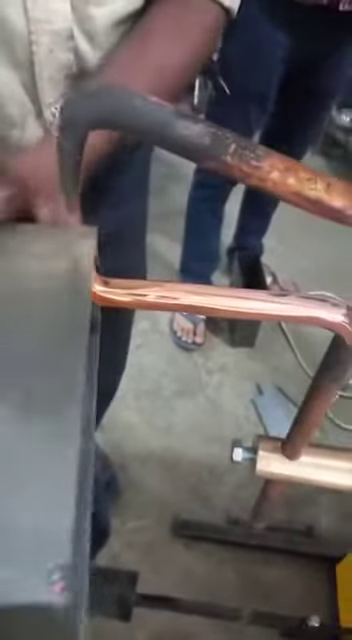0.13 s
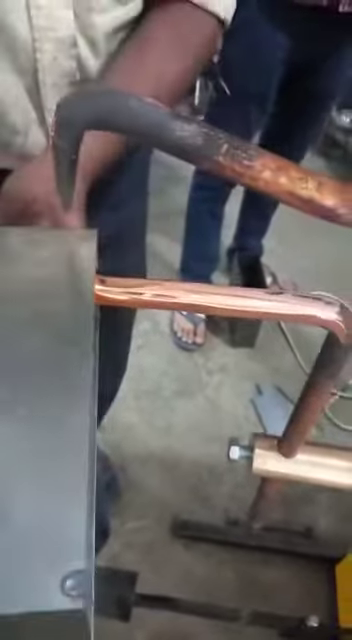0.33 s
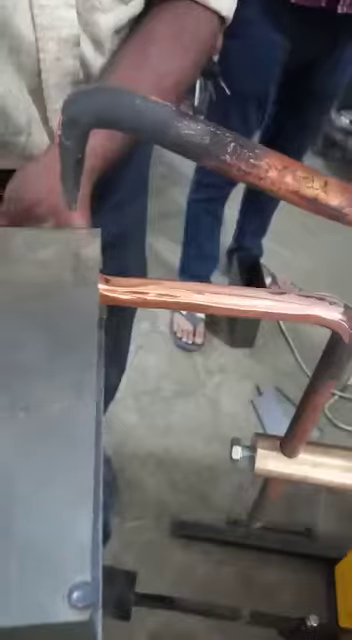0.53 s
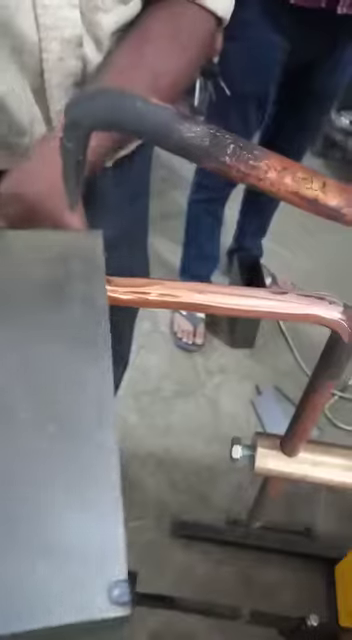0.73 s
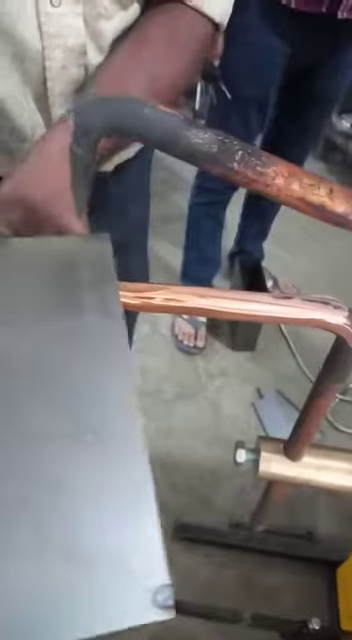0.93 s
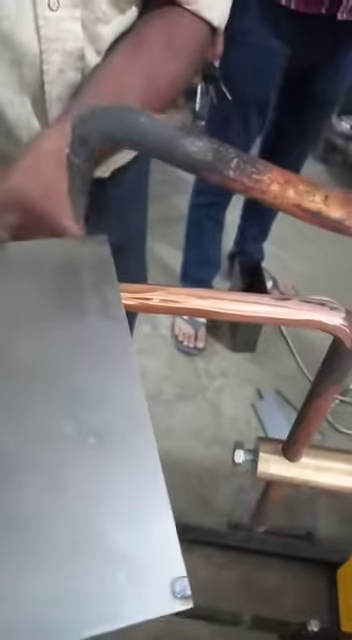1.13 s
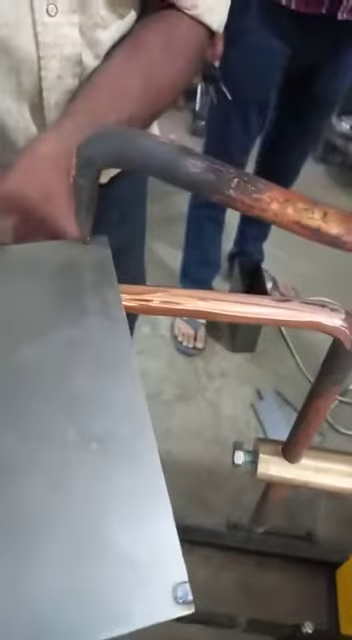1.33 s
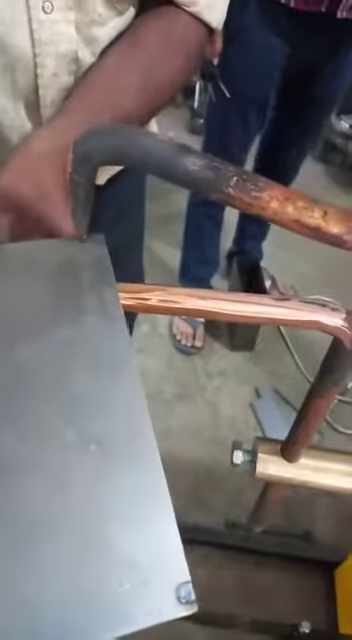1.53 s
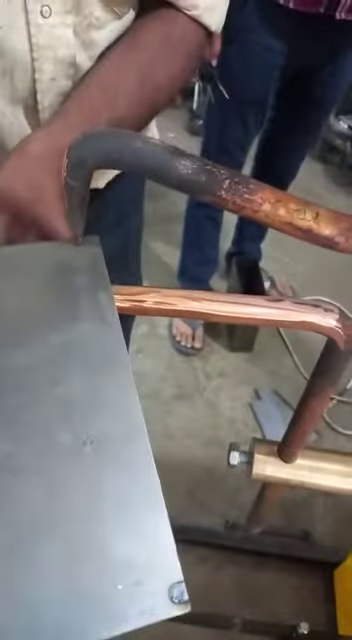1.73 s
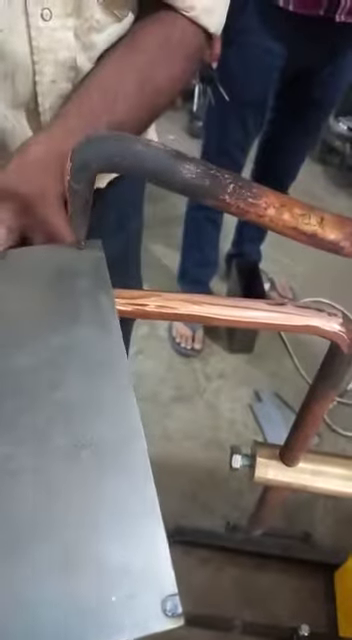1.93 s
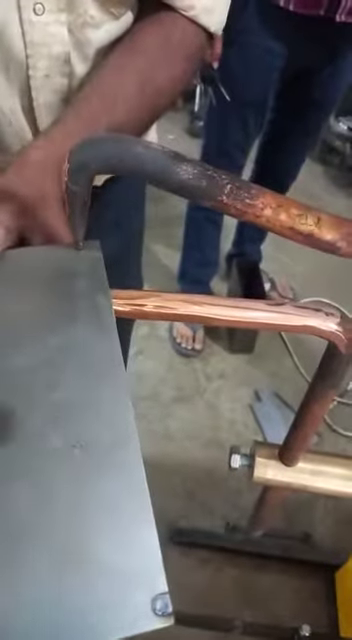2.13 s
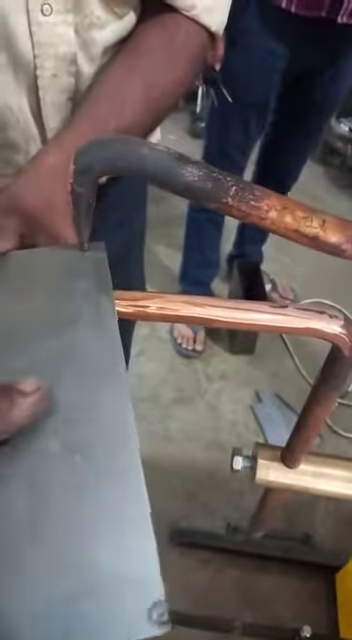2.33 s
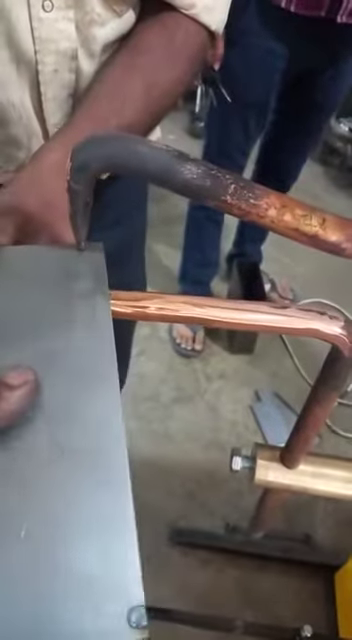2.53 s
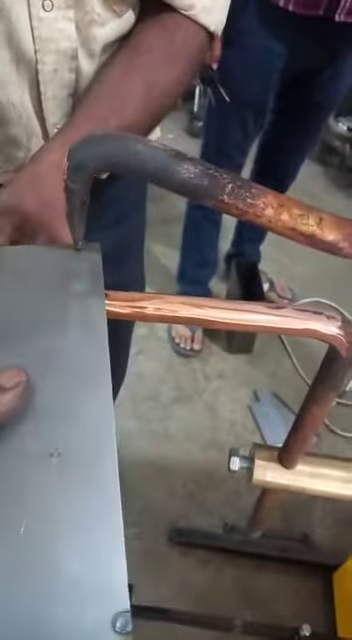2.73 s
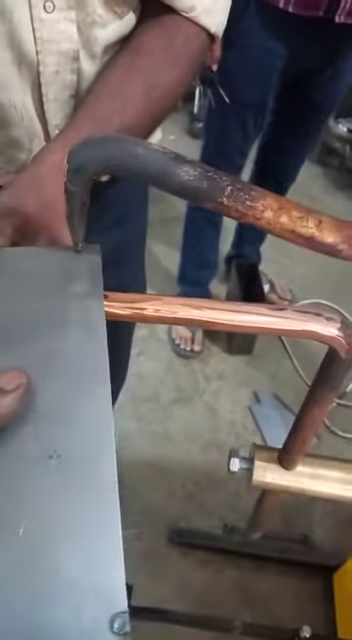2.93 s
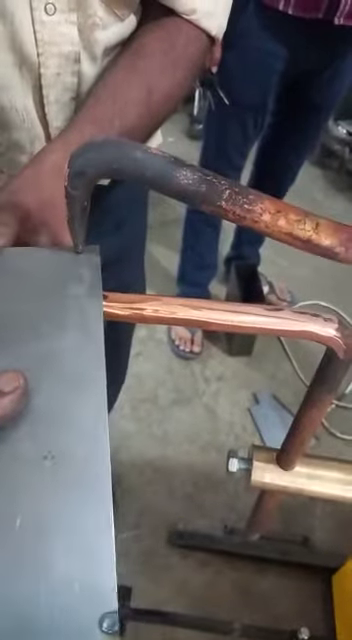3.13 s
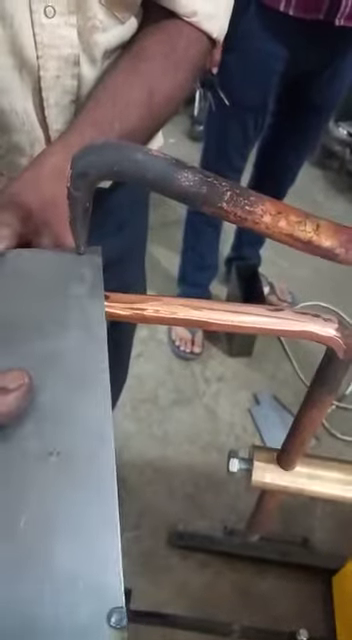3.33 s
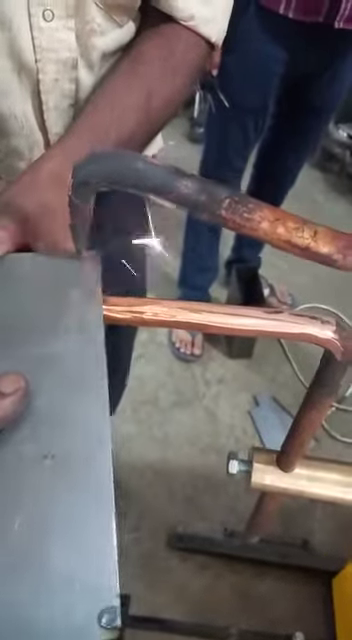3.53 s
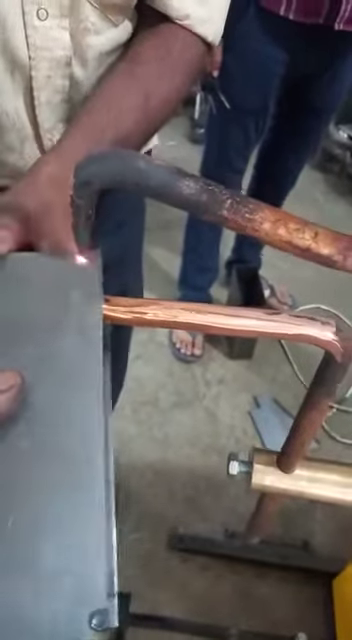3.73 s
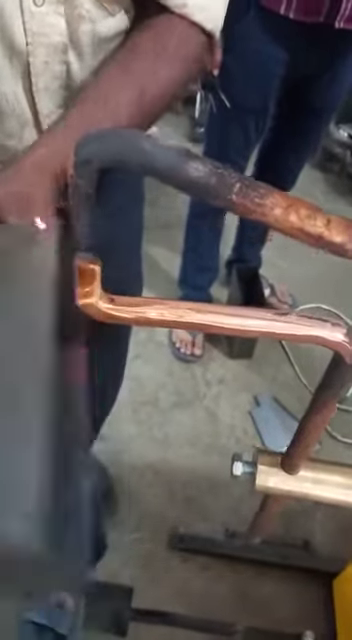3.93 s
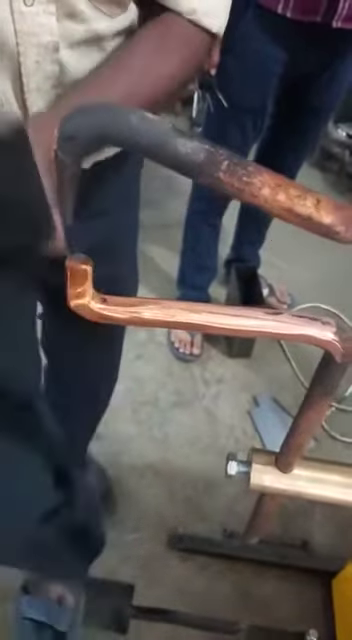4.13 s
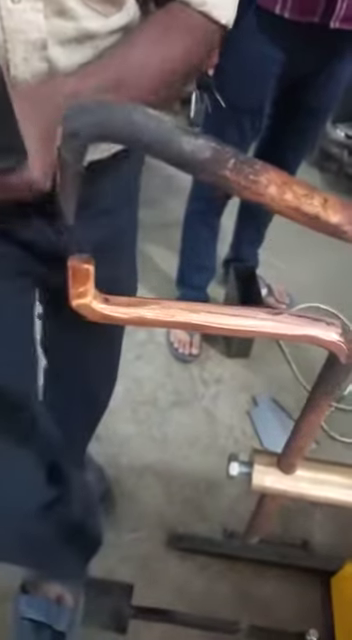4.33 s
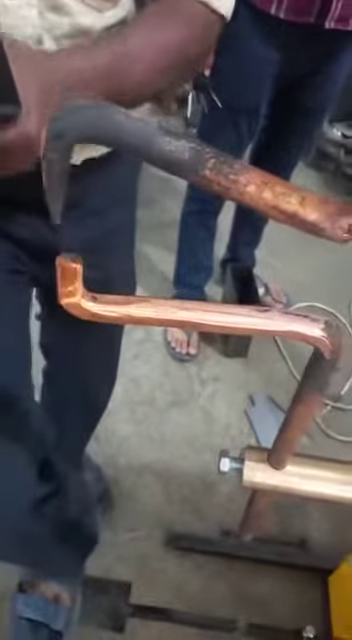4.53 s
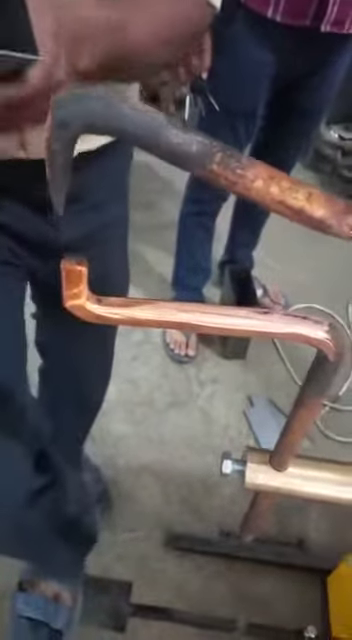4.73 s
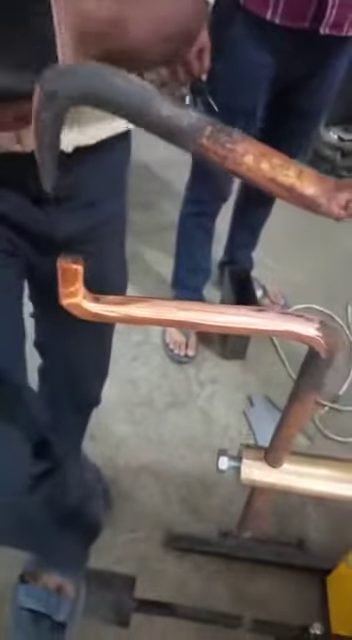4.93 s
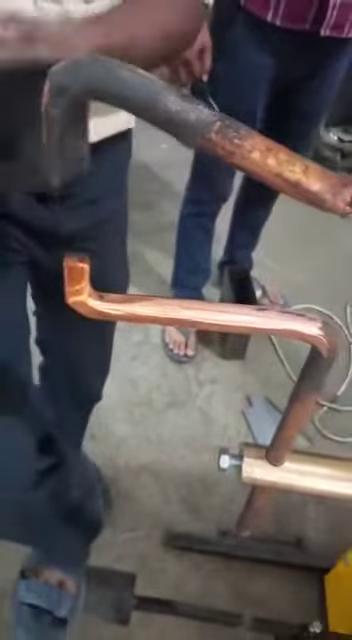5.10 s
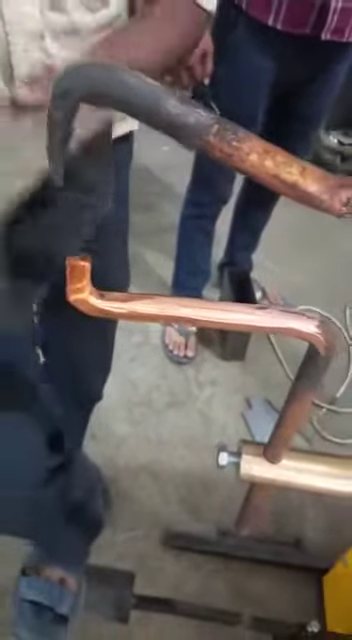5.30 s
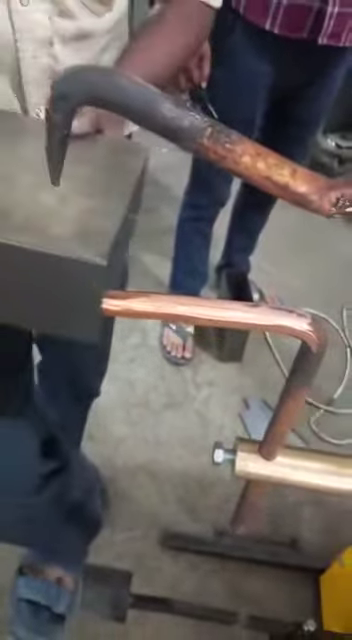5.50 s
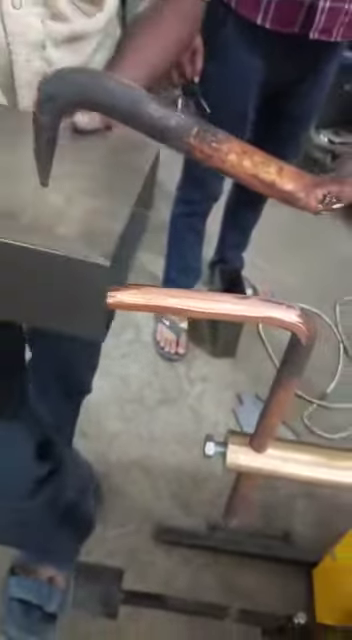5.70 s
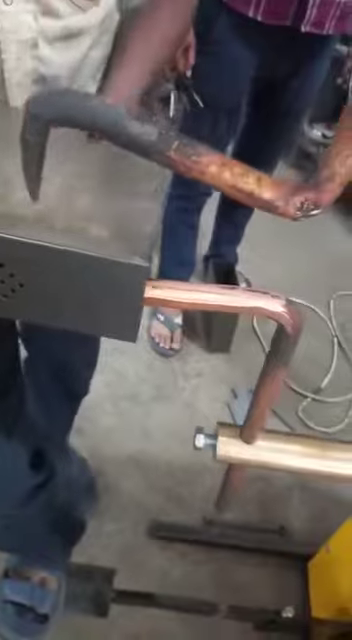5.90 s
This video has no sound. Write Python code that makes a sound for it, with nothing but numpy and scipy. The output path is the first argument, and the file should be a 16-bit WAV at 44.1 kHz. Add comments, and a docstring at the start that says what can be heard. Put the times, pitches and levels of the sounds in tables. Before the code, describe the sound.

A sheet-steel box knocks and scrapes in a humming workshop, a pedal creaks, a weld briefly buzzes, then one loud ringing clank.

```python
"""A sheet-steel box is knocked, slid and turned between the arms of a spot welder. Each knock drives a bank of
decaying box modes plus a short noise crack; steel and sandals scrape as shaped hiss. Noisy resonances make the
panels drum, the pedal linkage creak and an edge squeal; the weld current buzzes briefly as stacked harmonics.
The hard walls throw back a smeared tail of every knock and groan, over a low machine drone and the roar of the
shop."""
import sys
import numpy as np
from scipy import signal
from scipy.fft import rfft, irfft
from scipy.io import wavfile
from scipy.ndimage import uniform_filter1d

SR = 44100
rng = np.random.default_rng(int(sys.argv[2]) if len(sys.argv) > 2 else 0)


def materialize(psi):
    """Save the field psi as 16-bit PCM at rate SR to the path in sys.argv[1].

    A 1-D psi becomes a single channel; in a 2-D psi each row is a channel.
    """
    bounded = np.clip(np.atleast_2d(psi).T, -1, 1)
    quanta = np.round(bounded * 32767).astype(np.int16)
    wavfile.write(sys.argv[1], SR, quanta)


N = 267240  # length in samples

# Blows on the box: start_s, level_db, centre_hz of the driven modes, spread_octaves,
# contact_s (build-up time constant), ring_scale (multiplies the modes' ring time; over 1 rings longer)
BLOWS = [(.098, -30.5, 148, 0.29, 0.017, 1.05), (.100, -31.5, 500, 0.13, 0.0021, 0.28),
         (.176, -23.5, 715, 0.5, 0.0059, 0.44), (.190, -23, 2015, 0.97, 0.008, 0.61),
         (1.275, -28, 834, 0.5, 0.02, 0.2), (1.276, -49, 2230, .4, 0.0036, 0.64),
         (1.290, -48, 2800, 0.1, 0.0036, 0.85), (2.3727, -33.5, 2630, 0.42, 0.0046, 0.3),
         (2.372, -27, 740, 0.51, 0.0014, 0.53), (2.682, -50.5, 2640, 1.5, 0.0016, 1),
         (3.104, -40, 860, 0.66, 0.005, 0.74), (3.364, -34, 670, 0.29, 0.051, 0.57),
         (3.474, -32.5, 2400, 0.42, 0.018, 2), (3.474, -39, 4520, 0.089, 0.012, 1.4),
         (3.75, -39, 2980, 0.29, 0.003, 1.6), (3.790, -30, 890, 1, 0.26, 0.45),
         (3.838, -42, 2620, 0.04, 0.005, 2), (4.155, -42.5, 643, 0.045, 0.01, 0.42),
         (4.794, -40, 2200, 0.77, 0.0024, 0.5), (4.806, -46.5, 3600, 0.22, 0.0018, 0.41),
         (4.805, -45.5, 504, 0.078, 0.015, 4.7), (4.896, -46.5, 5070, 0.03, 0.00085, 2.1),
         (4.896, -47, 6200, 0.16, .002, 0.52), (4.897, -49, 3150, 0.04, 0.001, 1.1),
         (5.356, -51.5, 2320, 0.083, 0.0054, 0.15), (5.48, -26.5, 4750, 0.21, 0.0035, 0.85),
         (5.481, -15.5, 1540, 0.032, 0.0055, 0.88), (5.4813, -19, 1030, 0.9, 0.00083, 3.7),
         (5.505, -32, 4200, 0.56, 0.01, 0.59), (5.507, -25, 686, 0.61, 0.0087, 1),
         (5.609, -39.5, 1490, 0.06, 0.0068, 1.2), (5.707, -41.5, 1570, 0.25, 0.019, 2.6),
         (5.755, -37, 1000, 0.6, 0.015, 1.8)]
# Free modes of the box, before ring_scale: pitch_hz, level_db, t60_s
BOX_MODES = [(151.8, -7.5, 0.29), (488.6, -5, 0.26), (575.6, -7, 0.33), (653.6, -11.5, 0.3),
             (724, -3.5, 0.19), (786, -1, 0.17), (1060, -2.5, 0.041), (1218, -2.5, 0.2),
             (1497, -0.5, 0.074), (1660, -10, 0.08), (2038, -2.5, 0.15), (2326, 0.5, 0.061),
             (2610, 1, 0.099), (2855, -1.5, 0.067), (3150, -6, 0.13), (3660, -20, 0.045),
             (3910, -2.5, 0.089), (4160, -4, 0.077), (4420, -4.5, 0.1), (4820, 1.5, 0.052), (5130, -6, 0.2),
             (5646, -2.5, 0.11), (5590, -3.5, 0.062), (6440, -1.5, 0.04)]
# Noise spectrum of a blow's edge: pitch_hz, level_db
CRACK_COLOUR = [(300, -19), (1000, -2), (3000, 1.5), (6500, -9.5), (7500, -36.5)]
# Where the box is held: time_s, left_minus_right_db, left_lead_us
BOX_SIDE = [(.1, -0.5, -92.5), (1.3, -1.5, -36), (2.4, -5.5, -97), (3.401, -1, 220), (4.2, 5, 176),
            (4.8, -4.5, -300), (5.4, -9.5, 186), (5.5, 3.5, 126)]
SKIRT_DB = -23.5  # every blow also stirs the modes far from its centre
RATTLE_DB = 3.0  # rms flutter of each mode once the loose sheet rattles
CRACK_DB, CRACK_DB_PER_OCTAVE = -4.5, 7.5  # crack setting at a 1 kHz centre; brighter blows crack harder
GRIP_S, GRIP_T60 = 5.528, 0.06  # the hand damps the box after the big clank (s, added decay t60 s)

# Scraping strokes: start_s, level_db, length_s, hiss_db (treble, about 8 kHz up), body_db (under 1.2 kHz)
STROKES = [(0, -47.5, 0.0024, -15, 23), (0.083, -18.5, 0.11, -9, -62), (0.113, -25.5, 0.085, -6.5, 15.5),
           (0.284, -30, 0.14, -8.5, 13.5), (1.669, -28, 0.076, -13.5, -10),
           (1.777, -36.5, 0.074, -4.5, 12.5), (2.148, -52.5, 0.053, -6, 28.5),
           (2.177, -38, 0.11, -12.5, -15), (2.675, -31, 0.033, -7.5, -10),
           (2.801, -21.5, 0.067, -10.5, -10), (3.058, -49, 0.23, -17.5, 12), (3.377, -34, 0.089, -12, 15),
           (3.426, -35, 0.16, -84, 18.5), (3.587, -42.5, 0.21, -19, 19.5), (3.752, -38.5, 0.031, -15, 22),
           (3.764, -35, 0.076, -10, 19.5), (3.93, -44, 0.17, -11, 3), (4.077, -41, 0.085, -6, 8),
           (4.401, -25.5, 0.11, -9.5, -4), (4.614, -53.5, 0.086, 5, 25), (4.739, -44.5, 0.021, -6, 14),
           (4.776, -46, 0.13, -7.5, 23), (5.132, -45.5, .15, -8, -41), (5.368, -42, 0.081, -17, 17),
           (5.415, -46.5, .006, 1, -20), (5.481, -25.5, 0.011, -7, 13), (5.71, -39, 0.083, -6, 6.5),
           (5.942, -29, 0.064, -8, -6)]
# Friction hiss spectrum: pitch_hz, density_db (dB per Hz)
SCRAPE_COLOUR = [(250, -5), (450, -6.5), (700, -10.5), (1100, -2), (1940, 1), (3300, 0), (6450, -0.5),
                 (7000, -6), (7500, -14), (8600, -3), (11600, 1.5), (15800, -2)]
LUMPY_DB = 1.5  # random unevenness of colour within each stroke
SWELL_SHARE, SWELL_MAX_S = 0.52, 0.082  # a stroke rises for a share of its length, up to a limit
STRUCK_S, STRUCK_LAG_S, STRUCK_RISE_S = .012, .003, .002  # a stroke this near a blow follows it, lag, rise
NEAR_T60, FAR_T60, FAR_DB = 0.55, 0.96, -3.5  # direct hiss stops quickly, the shop's tail is weaker, slower
TREBLE_LOSS = 1  # extra share of decay speed in the treble

# Groaning linkage and drumming panels, one list per groan: time_s, level_db
GROANS = [
    [(.066, -48), (.096, -35), (.17, -40.5), (.65, -47.5)],
    [(3.37, -52), (3.40, -40.5), (3.53, -32), (3.60, -45), (3.70, -37), (3.86, -44), (4.1, -46)],
    [(5.53, -48), (5.60, -52), (5.68, -46), (5.72, -36.5), (5.81, -43.5), (5.86, -50.5)],
]
# Low panel resonances: pitch_hz, width_hz, level_db
GROAN_RING = [(220.4, 110, 5.5), (578.5, 130, 2), (641, 59, -5.5), (768, 120, -10), (1223, 140, -8.5)]
# The pedal linkage creaks under load: time_s, pitch_hz, level_db
CREAK = [(3.362, 520, -38), (3.372, 529, -28), (3.41, 617, -32), (3.478, 704, -33.5), (3.496, 652, -27.5),
         (3.515, 651, -43), (3.6, 646, -40)]
# An edge sings while dragged, dropping to a lower mode: time_s, pitch_hz, level_db
SQUEAL = [(.112, 6190, -43.5), (.143, 6200, -27), (.15, 5780, -33.5), (.2, 5790, -34), (.32, 5790, -53),
          (.34, 5840, -41.5), (.43, 5760, -49), (.62, 5790, -64)]
CREAK_WIDTH_HZ, SQUEAL_WIDTH_HZ = 53, 160

# Harmonics of the weld buzz: multiple, level_db
BUZZ = [(2, 2), (3, -7), (4, -8.5), (5, -14), (7, -9), (8, -9)]
BUZZ_HZ = 100  # twice the mains
WELD_ON_S, WELD_OFF_S, WELD_EDGE_S, WELD_DB = 3.56, 3.765, 0.054, -36.5

# Decay of the hard-walled shop: pitch_hz, t60_s
SHOP_DECAY = [(200, 1), (700, 0.42), (2000, 0.66), (5000, 0.25), (12000, 0.76)]
SMEAR_HZ = 300  # random phase smear that makes the wall tail less tonal

# Wavering lines of the machine drone: pitch_hz, level_db, width_hz
HUM_LINES = [(113, -49, 8.9), (68.4, -41, 4.1), (53.9, -49.5, 10), (85.5, -42, 6.5)]
# Spectrum of the shop's low roar: pitch_hz, density_db (dB per Hz)
ROAR_COLOUR = [(30, -31), (50, 0.5), (110, -4), (140, -12), (242, -15.5), (394, -22.5), (988, -36.5),
               (3250, -51), (6740, -53.5), (7310, -73), (16000, -63)]
HUM_HZ, HUM_DB, ROAR_DB = 116, -36.5, -34.5

# Stereo balance of the noises: pitch_hz, left_minus_right_db
TILT = [(60, .3), (150, 2.5), (500, 0), (1500, -5.5), (4000, -3), (10000, 2.5)]
# Left-right likeness of the noises: pitch_hz, correlation
SAME = [(60, .99), (180, .96), (550, .7), (1650, .1), (5000, -.1), (15000, .1)]
EDGE_HZ = 15900  # upper band limit


def blows():
    """Each contact builds up the box modes near its centre; they ring, flutter as loose sheet and crack."""
    t = np.arange(SR // 3) / SR
    hz, mode_db, t60 = np.transpose(BOX_MODES)[..., None]
    held, *sides = np.transpose(BOX_SIDE)
    out = np.zeros((2, N + SR))
    edge_hz = np.fft.rfftfreq(4096, 1 / SR)
    edges = rng.standard_normal((len(BLOWS), 2, 4096))  # separate crack noise for each port
    # Neighbouring modes start about half a cycle apart
    scatter = .08 * rng.standard_normal((len(BLOWS), len(BOX_MODES), 1))
    turns = np.arange(len(BOX_MODES))[:, None] / 2 + scatter
    # A new flutter value about every 7 ms; clean at first, full after 25 ms
    rattles = rng.standard_normal((len(BLOWS), len(BOX_MODES), len(t) // 300))
    flutter = RATTLE_DB * np.minimum(t / .025, 1)
    onset = np.minimum(t[:4096] / 6e-4, 1)
    for k, (start, level_db, centre_hz, octaves, contact, ring_scale) in enumerate(BLOWS):
        pan_db, lead_us = (np.interp(start, held, column) for column in sides)
        ports = t + np.array([lead_us, -lead_us])[:, None, None] / 2e6

        distance = np.log2(hz / centre_hz) / max(octaves, .05)
        share = np.exp(-.5 * distance ** 2) + gain_of(SKIRT_DB)
        fade = np.exp(-t / max(contact, 1e-4))
        build_up = 1 - fade ** 2
        ring_loss_db = 60 * t / (t60 * max(ring_scale, .1))
        grip_loss_db = 60 * np.maximum(start + t - GRIP_S, 0) / GRIP_T60 * (start < GRIP_S)
        rattle_db = flutter * signal.resample(rattles[k], len(t), axis=1)
        envelope = gain_of(mode_db - ring_loss_db - grip_loss_db + rattle_db) * build_up
        ring = (share * envelope * np.sin(2 * np.pi * (hz * ports + turns[k]))).sum(1)
        ring = ring / np.sqrt(np.mean(ring[:, :1000] ** 2))

        # The crack stays near the blow's centre; narrow pings hardly crack
        too_high = 1 + (edge_hz / (3.1 * centre_hz)) ** 4
        too_low = 1 + (centre_hz / (1.74 * edge_hz + 1)) ** 4
        edge_gain = gain_of(read(CRACK_COLOUR, edge_hz)) / too_high / too_low
        crack = evened(irfft(rfft(edges[k]) * edge_gain)) * fade[:4096] * onset
        crack_db = CRACK_DB + CRACK_DB_PER_OCTAVE * np.log2(centre_hz / 1e3)
        ring[:, :4096] += gain_of(crack_db) * min(4 * octaves, 1) * crack

        at = round(start * SR)
        out[:, at:at + len(t)] += gain_of(level_db + np.array([[pan_db], [-pan_db]]) / 2) * ring
    return out[:, :N]


def scrape():
    """Dense friction hiss: each stroke swells, holds and dies in the shop, the treble first."""
    blow_starts = [row[0] for row in BLOWS]

    def strokes(hz, s):
        """Sums the strokes' power at each pitch and moment, then colours it."""
        high = 1 / (1 + (7800 / (hz + 1)) ** 12)
        low = 1 / (1 + (hz / 1200) ** 4)
        power = 0
        # A small random unevenness of colour, drawn anew for each stroke
        lumps = rng.standard_normal((len(STROKES), len(hz), 1))
        lumps = evened(uniform_filter1d(lumps, size=3, axis=1))
        for (start, level_db, length, hiss_db, body_db), lump in zip(STROKES, lumps):
            colour_db = level_db + LUMPY_DB * lump + high * hiss_db + low * body_db
            after = 60 * np.maximum(s - start - length, 0) * (1 + TREBLE_LOSS * high)
            fall = np.maximum(gain_of(-after / NEAR_T60), gain_of(FAR_DB - after / FAR_T60))
            blow = min(blow_starts, key=lambda at: abs(at - start))
            if abs(blow - start) < STRUCK_S:
                start, rise = blow + STRUCK_LAG_S, STRUCK_RISE_S
            else:
                rise = np.clip(SWELL_SHARE * length, 1e-3, SWELL_MAX_S)
            swell = np.clip((s - start) / rise, 0, 1)
            power = power + (swell * fall * gain_of(colour_db)) ** 2
        return np.sqrt(power) * gain_of(read(SCRAPE_COLOUR, hz))

    slips = evened(uniform_filter1d(rng.standard_normal(N), size=300))  # a few ms each
    grit = gain_of(0.51 * slips)
    return noise(strokes, size=256, patchy_db=1.5) * grit


def groan():
    """Rough, jerky sliding drives the low panel resonances."""
    ring = evened(sum(gain_of(db) * fuzzy(hz, width) for hz, width, db in GROAN_RING))
    jerks = gain_of(1.8 * evened(uniform_filter1d(rng.standard_normal(N), size=700)))
    return ring * jerks * sum(level(rows) for rows in GROANS)


def creak():
    """The loaded pedal linkage rubs out one rough tone of moving pitch."""
    return sing(CREAK, CREAK_WIDTH_HZ)


def squeal():
    """A dragged edge sings in one high, rough mode, a little to the right."""
    return sing(SQUEAL, SQUEAL_WIDTH_HZ) * gain_of([[-1.5], [1.5]])


def weld():
    """While current flows the transformer and arms buzz at multiples of twice the mains."""
    t = np.arange(N) / SR
    on = np.clip(np.minimum(t - WELD_ON_S, WELD_OFF_S - t) / WELD_EDGE_S, 0, 1)
    buzz = sum(gain_of(db) * np.sin(2 * np.pi * (k * BUZZ_HZ * t + rng.random())) for k, db in BUZZ)
    return gain_of(WELD_DB) * on * evened(buzz)


def shop(x):
    """Wall returns as sparse taps of random sign, each band dying at its own speed."""
    taps = np.zeros((2, SR))
    at = np.arange(300, SR - 20, 20) + rng.integers(0, 20, (2, (SR - 301) // 20))
    np.put_along_axis(taps, at, rng.choice([-1., 1.], at.shape), 1)
    hz, t, z = signal.stft(taps, SR, nperseg=256)
    decay = gain_of(-60 * t / read(SHOP_DECAY, hz)[:, None])
    tail = signal.istft(z * decay, SR, nperseg=256)[1]
    # A random walk of phase smears every pitch
    steps = uniform_filter1d(rng.standard_normal(N), size=80)
    wander = np.cumsum(steps) * np.sqrt(2 * np.pi * SMEAR_HZ / SR)
    smeared = (signal.hilbert(x.mean(0)) * np.exp(1j * wander)).real
    return signal.fftconvolve(smeared[None], tail / np.linalg.norm(tail[0]), axes=1)[:, :N]


def hum():
    """A machine's low drone, part steady sine and part wavering lines, over the shop's low noise roar."""
    lines = sum(gain_of(db) * fuzzy(hz, width) for hz, db, width in HUM_LINES)
    steady = gain_of(HUM_DB) * evened(np.sin(2 * np.pi * HUM_HZ * np.arange(N) / SR))
    drone = (lines + steady) * gain_of([[.6], [-.6]])
    roar = evened(noise(lambda hz, s: gain_of(read(ROAR_COLOUR, hz)), size=2048, patchy_db=1.5))
    return drone + gain_of(ROAR_DB) * roar


def sing(rows, width):
    """One narrow, rough resonance that follows (time_s, pitch_hz, level_db) rows."""
    s, hz, db = np.transpose(rows)
    pitch = np.interp(np.arange(N) / SR, s, hz)
    return fuzzy(pitch, width) * level(np.transpose([s, db]))


def fuzzy(hz, width):
    """Noise through a steep two-stage resonance: a wavering tone of rms 1."""
    r = np.exp(-np.pi * width / SR)
    turn = np.exp(2j * np.pi * np.cumsum(hz * np.ones(N)) / SR)
    drift = rng.standard_normal(N + SR) + 1j * rng.standard_normal(N + SR)
    slow = signal.lfilter([1], np.convolve([1, -r], [1, -r]), drift)[SR:]  # drop the filter's first second
    return evened((turn * slow).real)


def noise(gain, size, patchy_db):
    """Two-port noise shaped by gain(hz, s), with drifting patches, stereo tilt and likeness."""
    hop = size // 4
    hz = np.fft.rfftfreq(size, 1 / SR)[:, None]
    s = np.arange(N // hop + 5) * hop / SR
    a, b, c, d, patches = rng.standard_normal((len(s), len(hz), 5)).T
    patches = uniform_filter1d(uniform_filter1d(patches, size=5, axis=0), size=8, axis=1)
    patches = evened(patches)
    same = np.clip(read(SAME, hz), -1, 1)
    left = a + 1j * b
    right = same * left + np.sqrt(1 - same ** 2) * (c + 1j * d)
    side = gain_of(read(TILT, hz) / 2)
    z = np.array([left * side, right / side]) * gain(hz, s) * gain_of(patchy_db * patches)
    return signal.istft(z, nperseg=size, noverlap=size - hop)[1][:, :N] / np.sqrt(size / 3)


def level(rows):
    """Gain at each sample from (time_s, level_db) rows, at -150 dB outside them."""
    s, db = np.transpose(rows)
    return gain_of(np.interp(np.arange(N) / SR, s, db, left=-150, right=-150))


def read(points, hz):
    """Reads a spectrum table on a log-frequency axis."""
    f, value = np.transpose(points)
    return np.interp(np.log(hz + 1), np.log(f + 1), value)


def evened(x):
    """Scales to rms 1."""
    return x / np.sqrt(np.mean(x ** 2) + 1e-20)


def gain_of(db):
    """Decibels to amplitude."""
    return 10 ** (np.asarray(db) / 20)


def scene():
    """Knocks, rubs, weld and scrape, with wall returns of knocks and rubs, over the hum."""
    knocks = blows()
    rubs = groan() + creak() + squeal()
    walls = shop(gain_of(-5.5) * knocks + gain_of(-1.0) * rubs)
    return knocks + rubs + weld() + scrape() + walls + hum()


def record(dry):
    """A small microphone loses the deepest bass; then the band limit."""
    thin = signal.sosfilt(signal.butter(4, 48, "high", fs=SR, output="sos"), dry)
    band_limit = signal.firwin(511, EDGE_HZ, window=("kaiser", 9), fs=SR)
    return signal.oaconvolve(thin, band_limit[None], "same")


dry = scene()
out = record(dry)
materialize(out)
```